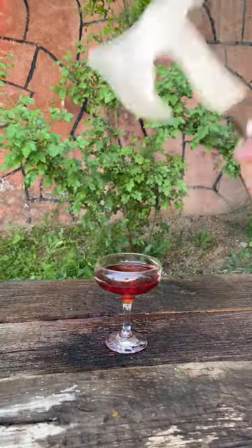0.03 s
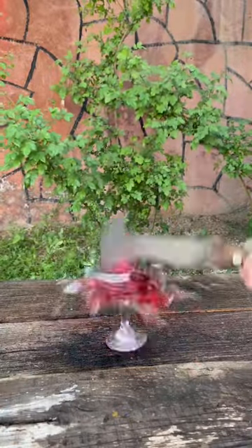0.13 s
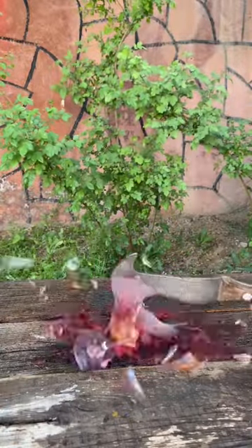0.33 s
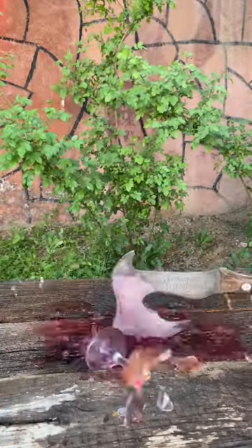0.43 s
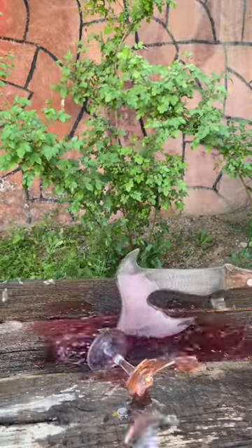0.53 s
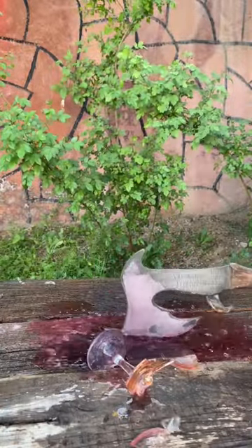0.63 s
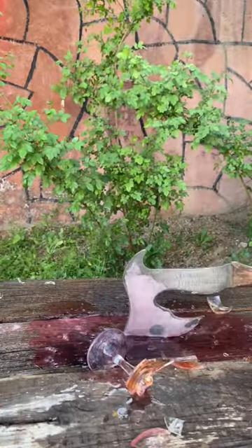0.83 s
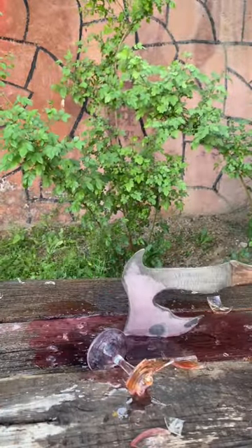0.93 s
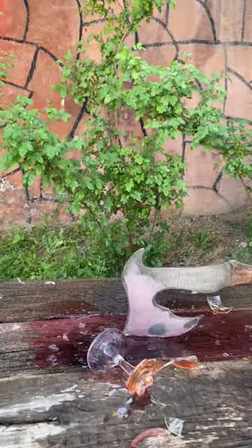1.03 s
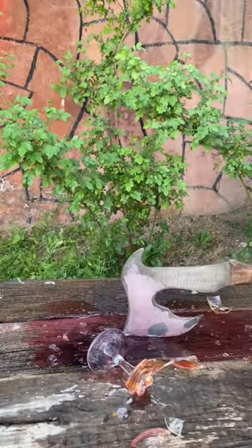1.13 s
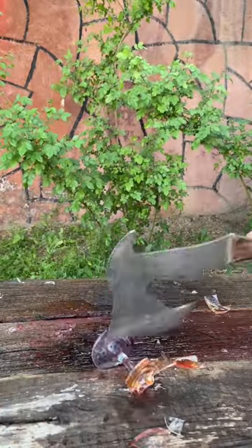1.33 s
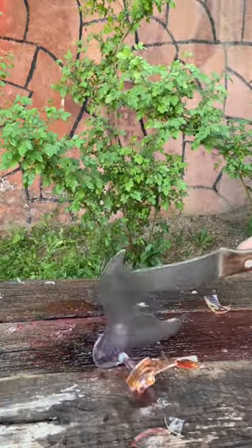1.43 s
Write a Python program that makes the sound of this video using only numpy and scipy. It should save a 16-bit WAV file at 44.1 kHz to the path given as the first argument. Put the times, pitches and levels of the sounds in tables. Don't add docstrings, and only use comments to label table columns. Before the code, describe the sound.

After a brief faint outdoor hiss, an axe smashes a glass on wooden planks with a loud, overloaded crack and thud; wet spatter and shards scatter, clink and bounce, then soft wind remains, heard close.

```python
import sys
import numpy as np
from scipy import signal
from scipy.fft import rfft, irfft
from scipy.io import wavfile
from scipy.ndimage import uniform_filter1d

SR = 44100
rng = np.random.default_rng(int(sys.argv[2]) if len(sys.argv) > 2 else 0)


def gain_from_db(level_db):
    decades = np.asarray(level_db, float) / 20
    return 10 ** decades


def dump_mix(stems):
    frames = np.atleast_2d(stems).T
    limited = np.clip(frames, -1, 1)
    pcm = np.round(limited * 32767).astype(np.int16)
    wavfile.write(sys.argv[1], SR, pcm)


N = 66150

# frequency in Hz, density in dB per Hz.
YARD_SPECTRUM = [(88, -48), (150, -3), (420, -13.5), (453, -9), (595, -11.5), (4310, -21.5), (8010, -37.5),
                 (9180, -44), (15500, -78)]
# frequency in Hz, left-right correlation from -1 to 1.
YARD_LIKENESS = [(60, 0.1), (240, -0.075), (950, 0.12), (3770, -0.023), (15000, -0.09)]
# frequency in Hz, density in dB per Hz.
WIND_SPECTRUM = [(12, -62.5), (30, -9), (62, -0.5), (90, -4.5), (140, -10), (190, -30), (400, -25.5),
                 (800, -81.5)]
# time in seconds, level in dB.
WIND_LEVEL = [(0, -52.5), (.28, -49.5), (.31, -82), (.42, -66), (.46, -56.5), (.6, -49), (.69, -47),
              (.72, -54.5), (.83, -52), (.92, -48.5), (1.15, -45), (1.19, -54), (1.3, -43), (1.4, -46.5),
              (1.5, -46)]
# frequency in Hz, density in dB per Hz.
SPATTER_SPECTRUM = [(88, -59), (150, -26), (205, -1), (1600, -5), (1980, -6.5), (2270, -7.5), (5330, -15),
                    (12000, -32.5), (15500, -82)]
# time in seconds, level in dB.
SPATTER_LEVEL = [(.205, -55.5), (.222, -27), (.24, -31), (.26, -31), (.32, -43.5), (.45, -46), (.5, -48.5),
                 (.545, -45), (.59, -45), (.66, -45), (.76, -51.5), (.81, -60), (.868, -40.5),
                 (.885, -49.5), (.92, -55.5), (1.05, -71)]
# start in seconds, level in dB, note
# in Hz, 60 dB decay in seconds.
SHARD_RINGS = [(0.207, -34.5, 3730, 0.18), (0.213, -26, 6500, 0.11), (0.235, -21.5, 1780, 0.076),
               (.262, -33, 3470, .1), (.33, -44, 3675, 0.44), (.355, -41.5, 9819, 0.095),
               (.355, -48.5, 11580, 0.11), (0.375, -44.5, 8066, 0.19), (0.512, -43, 5319, 0.23),
               (.513, -37, 11680, 0.029), (0.56, -29.5, 5609, 0.099), (0.557, -27.5, 1720, 0.12),
               (0.566, -54, 9000, 0.2), (.559, -57, 10500, 0.089), (.58, -34, 6600, 0.07),
               (.578, -55, 14600, 0.13), (.691, -37.5, 9200, 0.081), (.691, -53, 11900, 0.15),
               (.727, -37.5, 7500, 0.2), (1.077, -56, 9000, 0.2),
               (.713, -44, 9140, .1),
    (.954, -71, 12600, .3),
    (.515, -50, 9114, .08),
    (.558, -40, 11350, .05),
    (.64, -63, 14350, .15),
    (.872, -50, 5300, .06),
    (1.242, -54, 5250, .04),
]
# start in seconds, level in dB, note in Hz, rise in seconds,
# 60 dB decay in seconds.
SHARD_SWELLS = [(.2343, -7, 3625, .002, .018), (.2431, -25, 1780, .006, .15), (.2466, -20, 3170, .003, .04),
                (.2586, -3, 3830, .0017, .011), (.2591, -13, 3150, .0012, .01),
                (.2604, -11, 4900, .0015, .017), (.2621, -29, 1735, .004, .05), (.267, -35, 4075, .006, .1),
                (.27, -43, 7500, .005, .18), (.271, -44, 7050, .005, .14), (.285, -37, 1752, .015, .5),
                (.298, -43, 8000, .004, .04), (.33, -46, 4030, .05, .4), (.341, -38, 5333, .018, .3),
                (.36, -49, 6400, .02, .15), (.365, -57, 12300, .015, .1), (.366, -56, 11100, .015, .1),
                (.381, -29, 1954, .02, .12), (.405, -53, 9200, .01, .2), (.41, -46, 5185, .014, .3),
                (.42, -43, 4054, .025, .15), (.421, -60, 12000, .02, .2), (.453, -40, 1955, .045, 1.1),
                (.53, -52, 9200, .004, .04), (.5311, -36, 3700, .002, .015)]
# start in seconds, level in dB, colour in Hz, 60 dB decay in seconds.
GLASS_CRACKS = [(.2138, -19, 4340, .012), (.2211, -3, 3880, .012), (.2213, -5, 2110, .014),
                (.222, -15, 1250, .02), (.2225, -9, 5700, .014), (.2239, -8, 1640, .022),
                (.2265, -15, 2800, .012), (.2298, -13, 3000, .012), (.2305, -10, 4400, .012),
                (.2307, -13, 2315, .02), (.2325, -17, 5560, .02), (.2345, -10, 3250, .01),
                (.2593, -14, 5700, .007), (.26, -29, 9800, .008), (.292, -43, 10000, .01),
                (.306, -38, 5070, .016), (.349, -38, 9000, .04), (.3492, -45, 11800, .02),
                (.36, -40, 6300, .012), (.384, -30, 3200, .014), (.443, -39, 5500, .006),
                (.5125, -34, 5000, .004), (.513, -45, 12800, .02), (.521, -28, 3480, .012),
                (.559, -20.5, 3720, .011), (.5795, -11, 4800, .0035), (.5876, -31, 3500, .01),
                (.617, -30, 5070, .0067), (.634, -23, 8330, .0027), (.65, -40, 5000, .008),
                (.6905, -25, 4870, .004), (.713, -36, 4420, .006), (.7265, -28, 3250, .0027),
                (.768, -34, 4070, .007), (.7682, -46, 11000, .005), (.839, -48, 10000, .004),
                (.8405, -44, 6000, .005), (.8612, -32, 2600, .007), (.8636, -34, 3600, .006),
                (.866, -45, 8500, .005), (.871, -34, 3100, .006), (.874, -46, 10500, .005),
                (.8761, -42, 5300, .01), (.882, -39, 3500, .005), (.942, -38, 5500, .004),
                (.954, -43, 7800, .006)]
# start in seconds, level in dB, pitch in Hz,
# 60 dB decay in seconds.
PLANK_KNOCKS = [(.2261, -25, 750, .025), (.2336, -13, 640, .026), (.2353, -13, 205, .075),
                (.2771, -21, 223, .12), (.2796, -25, 850, .02), (.2801, -27, 510, .063),
                (.386, -35, 1042, .06), (.44, -38, 500, .04), (.47, -37, 800, .03), (.508, -28, 750, .019),
                (.5201, -33, 252, .12), (.5215, -21, 1040, .022), (.53, -31, 600, .03),
                (.5586, -16, 520, .06), (.5588, -12, 1000, .014), (.5616, -12, 700, .014),
                (.565, -34, 135, .19), (.5656, -14, 620, .016), (.5721, -25, 1500, .025),
                (.581, -29, 288, .1), (.5815, -16, 864, .03), (.649, -35, 893, .06), (.654, -33, 486, .039),
                (.701, -40, 969, .08), (.755, -35, 250, .09), (.764, -40, 826, .05), (.828, -39, 556, .05),
                (.8481, -29, 1100, .008), (.892, -32, 650, .035)]
# start in seconds, level in dB, pitch in Hz, length in seconds.
WIND_PUFFS = [
    (0.8452, -25, 111.4, 0.011),
    (0.853, -33.5, 58, 0.033),
    (1.234, -28.5, 83.5, 0.018),
    (1.25, -28.5, 69, 0.032),
]

WOOD_PAN_DB, GLASS_PAN_DB, WIND_PAN_DB = -2.5, -0.4, 5


def evened(x):
    return x / np.sqrt(np.mean(x ** 2) + 1e-20)


def read(points, hz):
    f, value = np.transpose(points)
    return np.interp(np.log(hz + 1), np.log(f + 1), value)


def curve(points):
    return gain_from_db(np.interp(np.arange(N) / SR, *np.transpose(points)))


def coloured(x, table):
    gain = gain_from_db(read(table, np.fft.rfftfreq(N, 1 / SR)))
    return evened(irfft(rfft(x) * gain, N))


def add(mix, s, sound, pan_db):
    part = mix[:, round(s * SR):][:, :len(sound)]
    part += gain_from_db([[pan_db / 2], [-pan_db / 2]]) * sound[:part.shape[1]]


def air():
    yard_db, fizz_db, fizz_db_per_s = -51.5, 7.5, -3.5
    a, b, c, d = rfft(rng.standard_normal((4, N)))
    same = np.clip(read(YARD_LIKENESS, np.fft.rfftfreq(N, 1 / SR)), -1, 1)
    right = same * a + np.sqrt(1 - same ** 2) * b
    hiss = coloured(irfft([a, right], N), YARD_SPECTRUM)
    high_pass = signal.butter(2, 3000, "high", fs=SR, output="sos")
    fizz = signal.sosfilt(high_pass, hiss)
    hiss = hiss + fizz * (gain_from_db(fizz_db + fizz_db_per_s * np.arange(N) / SR) - 1)
    rumble = coloured(irfft([c, 0.33 * c + 1.15 * d], N), WIND_SPECTRUM)
    return gain_from_db(yard_db) * hiss + curve(WIND_LEVEL) * rumble


def debris():
    grains_per_s, spread_db, grain_t60 = 5000, 3., .008
    size = gain_from_db(spread_db * np.minimum(rng.exponential(1, (2, N)), 5))
    landing = rng.random((2, N)) < grains_per_s / SR
    strikes = size * landing * rng.choice([-1., 1.], (2, N))
    t = np.arange(600) / SR
    grain = rng.standard_normal((2, 600)) * gain_from_db(-60 * t / grain_t60)
    a, b = signal.oaconvolve(strikes, grain, axes=1)[:, :N]
    return curve(SPATTER_LEVEL) * coloured(np.array([a, 0.93 * a + 0.45 * b]), SPATTER_SPECTRUM)


def ring(db, hz, t60, rise=.002):
    beat_hz, twin_db, tumble_db = 20, -10.5, 3.
    t = np.arange(min(int((rise + t60) * SR), 30000)) / SR
    a, b, c = rng.random(3)
    tumble = np.interp(t, np.arange(100) * .008, rng.standard_normal(100))
    mode = np.sin(2 * np.pi * (hz * t + a))
    twin = np.sin(2 * np.pi * ((hz + beat_hz * (.5 + c)) * t + b))
    level = gain_from_db(db - 60 * np.maximum(t - rise, 0) / t60 + tumble_db * tumble)
    return level * (mode + gain_from_db(twin_db) * twin) * np.minimum(t / rise, 1)


def burst(db, hz, t60, wide, tick_db):
    tick_t60, tick_top_hz, mic_top_hz = 0.011, 9000, 11500
    crunch_db, crunch_span, body_rise_s = -9.5, 1.8, .001
    t = np.arange(4000) / SR
    noise = rng.standard_normal((3, len(t)))
    kick = noise[0] * gain_from_db(-60 * t / t60 * 2) * 0.14 + (t == 0) * 2
    kick = uniform_filter1d(kick, size=int(SR / hz / 4) + 1)
    r = np.exp(-np.pi * wide * 2.2 / t60 / SR)
    body = signal.lfilter([1, -1], [1, -2 * r * np.cos(2 * np.pi * hz / SR), r * r], kick)
    body = body / abs(body).max() * np.minimum(t / body_rise_s, 1)
    tick = signal.lfilter(*signal.butter(3, min(tick_top_hz, 4 * hz), fs=SR), noise[1])
    tick = tick * gain_from_db(tick_db - 60 * t / tick_t60)
    edges = [hz / crunch_span, min(hz * crunch_span, 15000)]
    band = signal.butter(2, edges, "band", fs=SR, output="sos")
    crunch = evened(signal.sosfilt(band, noise[2]))
    crunch = crunch * gain_from_db(crunch_db - 60 * t / (1.11 * t60)) * np.minimum(t * hz, 1)
    mic = signal.butter(3, [70, mic_top_hz], "band", fs=SR, output="sos")
    return gain_from_db(db) * signal.sosfilt(mic, body + tick + crunch)


def glass_crack(db, hz, t60):
    return burst(db, hz, t60, wide=0.98, tick_db=-8)


def wall(x):
    wall_db, wall_t60 = -11, 0.06
    t = np.arange(8000) / SR
    sparse = rng.standard_normal((2, 8000)) * (rng.random((2, 8000)) < .05)
    tail = sparse * gain_from_db(-60 * t / wall_t60) * (t > .003)
    return gain_from_db(wall_db) * signal.fftconvolve(x, tail / np.linalg.norm(tail[0]), axes=1)[:, :N]


def plank_knock(db, hz, t60):
    return burst(db, hz, t60, wide=1.88, tick_db=-7)


def splinters(count=24):
    level_db, note_t60, strikes_per_s = -4, .09, 30
    t, out = np.arange(4000) / SR, np.zeros((2, N))
    clock = np.arange(N) / SR
    flying = (clock > .25) & (clock < .6)
    for hz in np.geomspace(4500, 12500, count) * rng.uniform(0.87, 1.03, count):
        strikes = rng.standard_normal(N) * (rng.random(N) < strikes_per_s / SR) * flying
        mode = gain_from_db(read(SPATTER_SPECTRUM, hz) - 60 * t / note_t60) * np.sin(2 * np.pi * hz * t)
        note = signal.oaconvolve(strikes, mode)[:N]
        out += note * (.5 + .5 * rng.random((2, 1)))
    return curve(SPATTER_LEVEL) * gain_from_db(level_db) * out / out[:, flying].std()


def puff(db, hz, length):
    t = np.arange(0, length, 1 / SR)
    swell = np.sqrt(np.sin(np.pi * t / length)) * np.minimum((length - t) * 500, 1)
    return -gain_from_db(db) * swell * np.sin(2 * np.pi * hz * t)


def microphones(hits):
    lead_s, lead_top_rad = 4e-5, 1.8
    lead = np.minimum(2 * np.pi * lead_s * np.fft.rfftfreq(N, 1 / SR), lead_top_rad)
    turn = np.exp(.5j * lead)
    return irfft(rfft(hits) * [turn, 1 / turn], N)


def scene():
    wind = air()
    hits = debris() + splinters()
    for s, db, hz, t60 in SHARD_RINGS:
        add(hits, s, ring(db, hz, t60), GLASS_PAN_DB)
    for s, db, hz, t60 in GLASS_CRACKS:
        add(hits, s, glass_crack(db, hz, t60), GLASS_PAN_DB)
    for s, db, hz, t60 in PLANK_KNOCKS:
        add(hits, s, plank_knock(db, hz, t60), WOOD_PAN_DB)
    for s, db, hz, rise, t60 in SHARD_SWELLS:
        add(hits, s, ring(db, hz, t60, rise), GLASS_PAN_DB)
    for s, db, hz, length in WIND_PUFFS:
        add(wind, s, puff(db, hz, length), WIND_PAN_DB)
    return microphones(hits) + wall(hits) + wind


def low_pass(x):
    return signal.sosfilt(signal.butter(12, 16000, fs=SR, output="sos"), x)


def record(dry):
    ceiling, dip_s, dip_width_s, dip_db, after_db = .93, 1.433, .013, -15, -6
    u = (np.arange(N) / SR - dip_s) / dip_width_s
    fade = gain_from_db(dip_db * np.exp(-u ** 2) + after_db * (u > 0))
    return low_pass(np.clip(dry, -ceiling, ceiling) * fade)


dry = scene()
out = record(dry)
dump_mix(out)
```